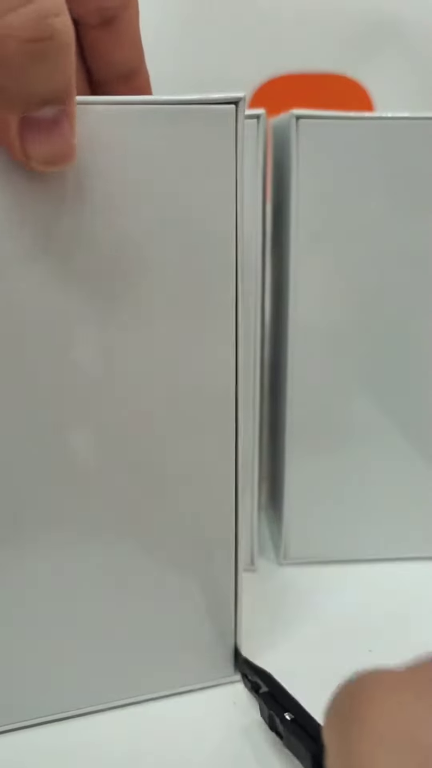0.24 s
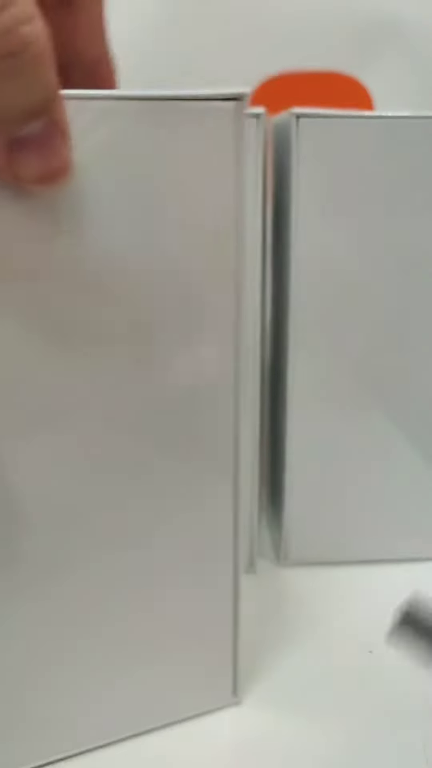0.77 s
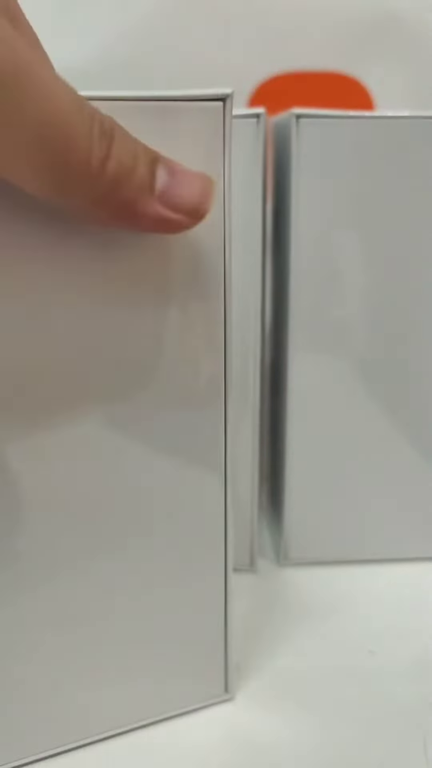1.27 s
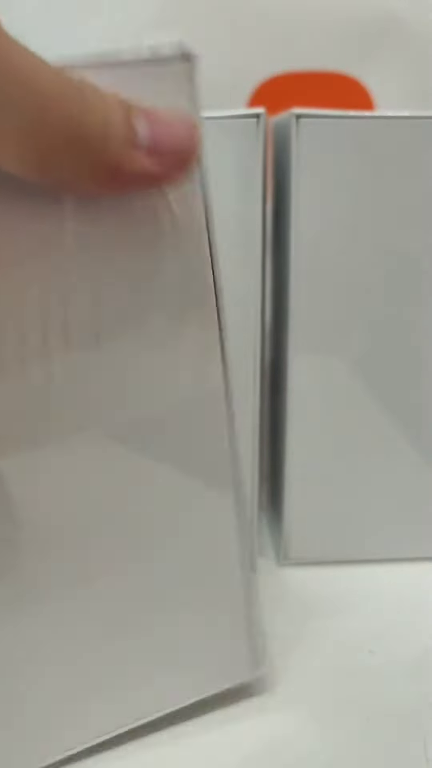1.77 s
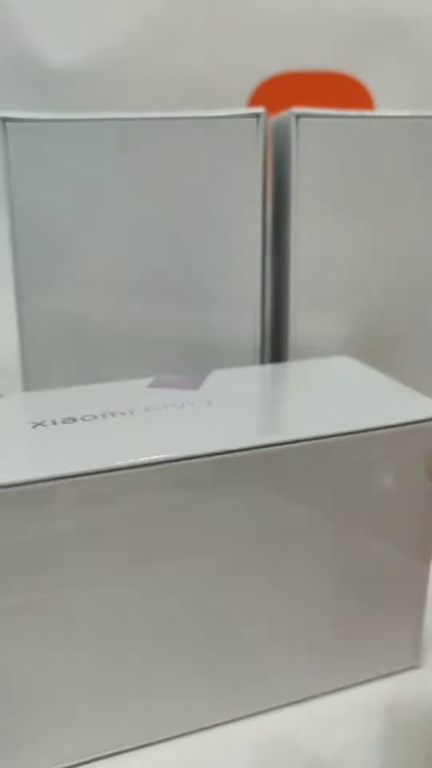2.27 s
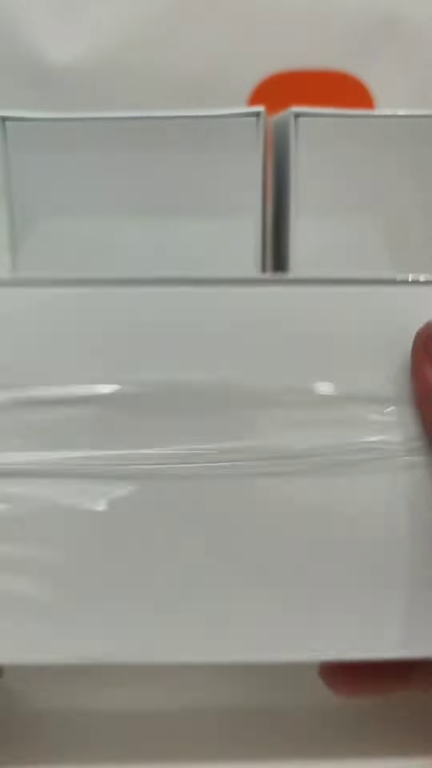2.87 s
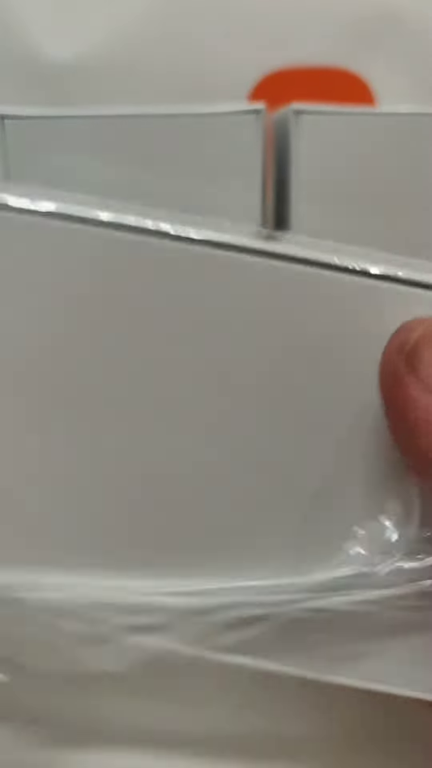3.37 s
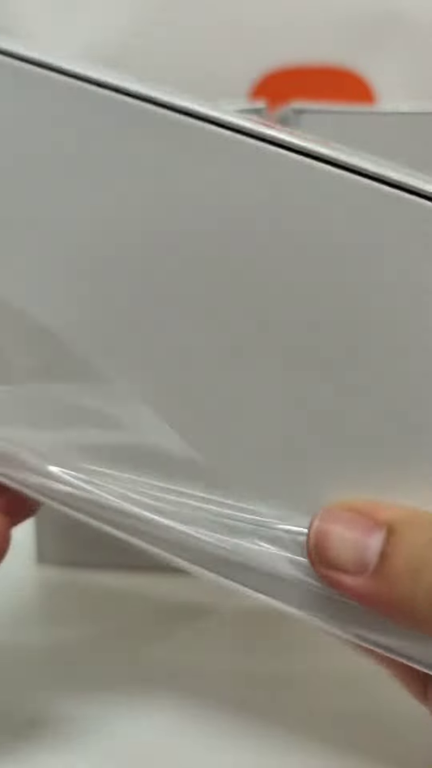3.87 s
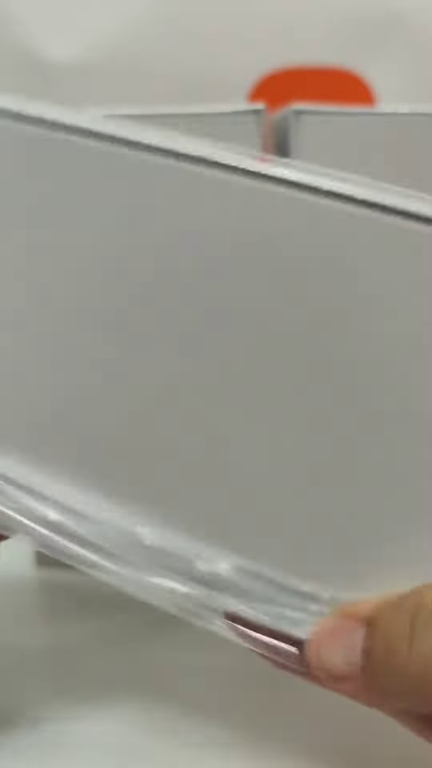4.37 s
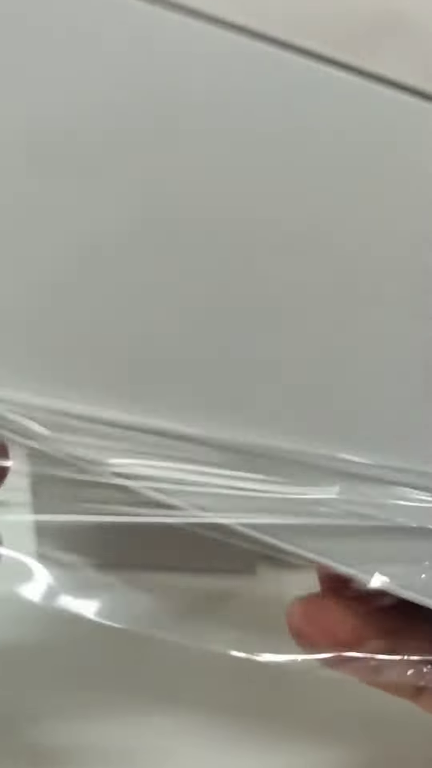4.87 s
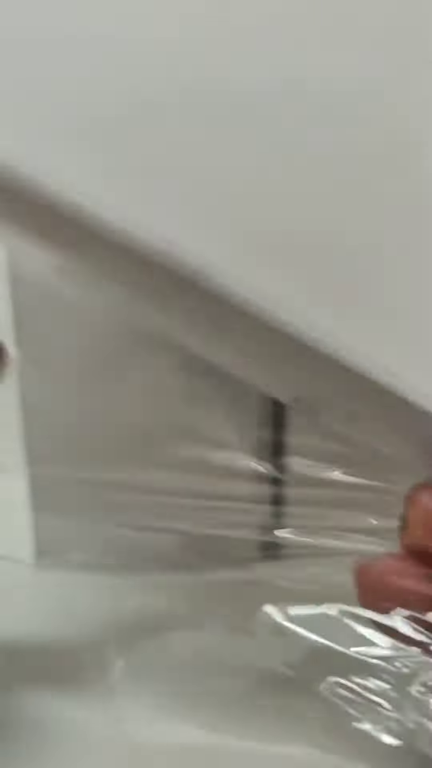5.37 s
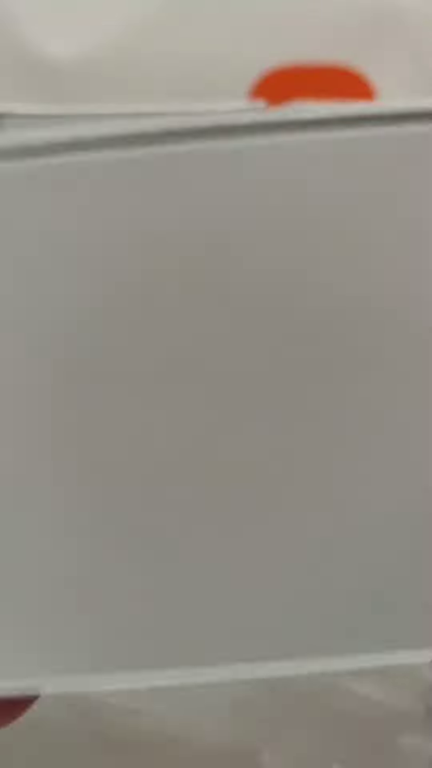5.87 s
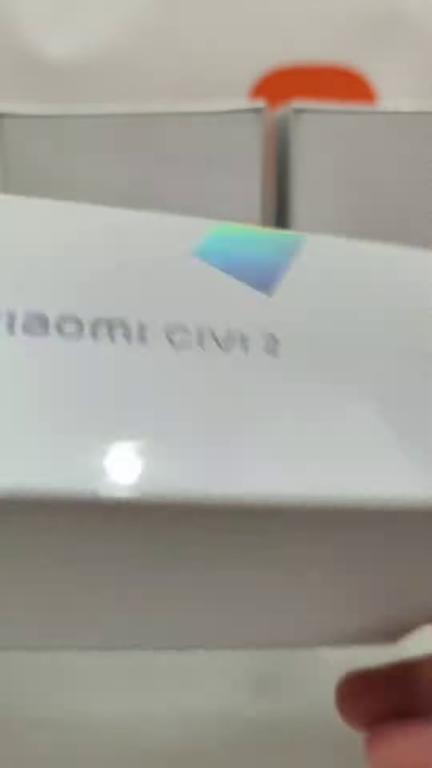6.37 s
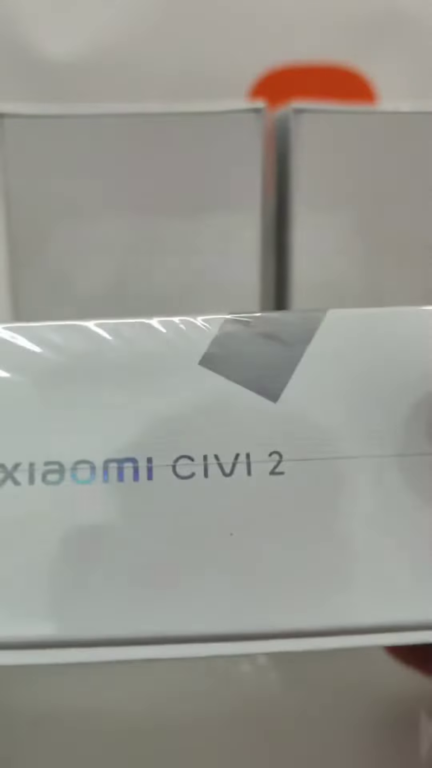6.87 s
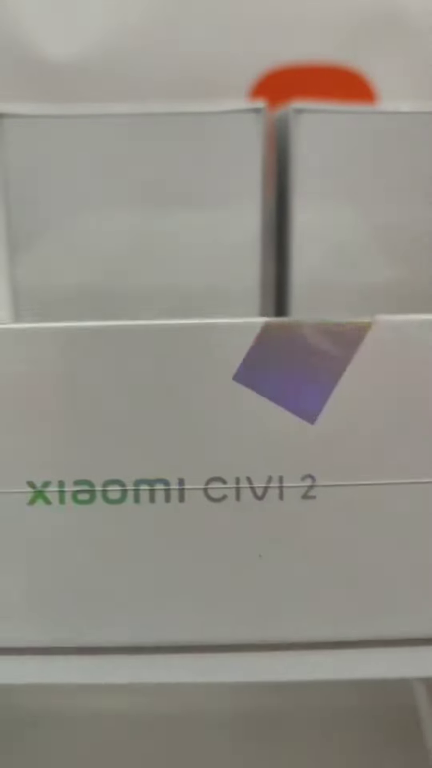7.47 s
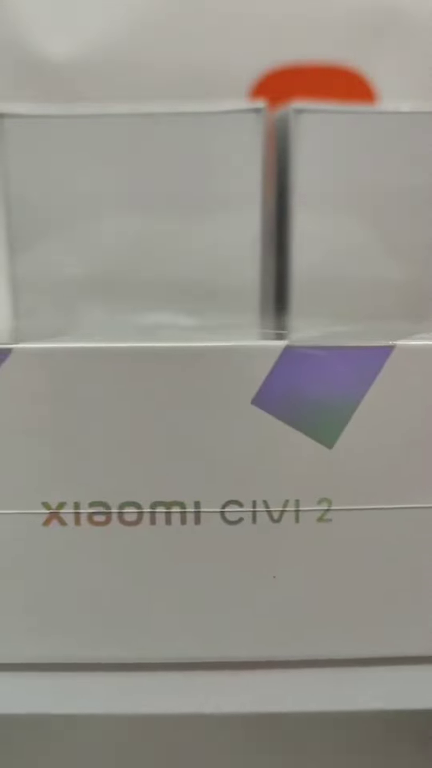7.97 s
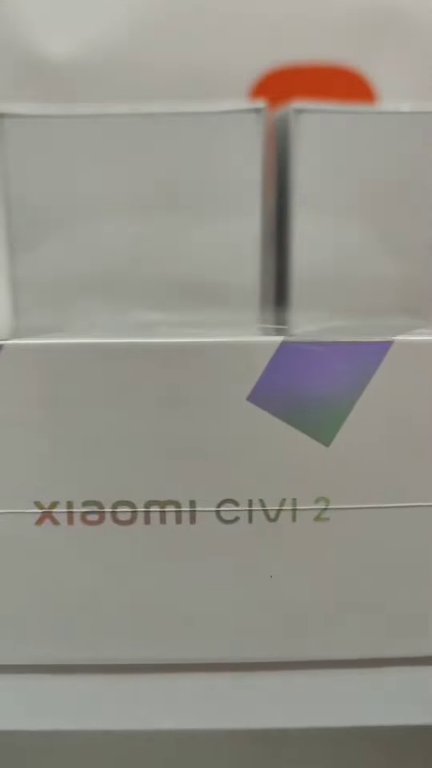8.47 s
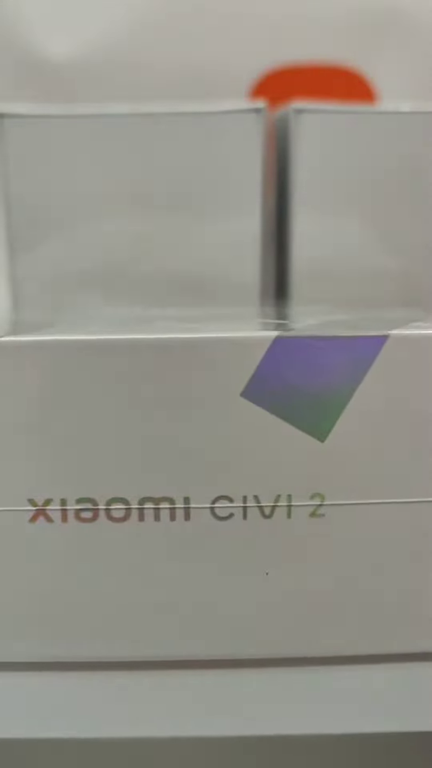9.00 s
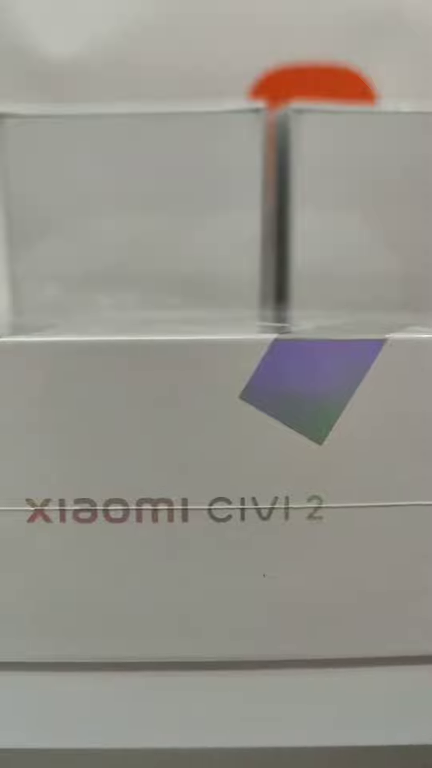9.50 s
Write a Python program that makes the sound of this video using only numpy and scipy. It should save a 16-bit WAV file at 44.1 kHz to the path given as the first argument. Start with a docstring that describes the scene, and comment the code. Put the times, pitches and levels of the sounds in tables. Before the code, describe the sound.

Close stereo microphones in a small room with a faint low hum. A wrapped paperboard box is tapped and rubbed, a blade slits its film in a brief slowing rasp, then a thin chink and loud hollow knocks. Clear film is peeled away with hisses, crackles and sharp snaps, dying to a few isolated ticks and near silence.

```python
"""A film-wrapped paperboard box is handled close to two microphones in a small room, over a low room hum.
First it is knocked and rubbed: blows excite damped wall modes, and rubs are jerky friction noise.
From about 1.1 s a blade slits the film by stick and slip, in broadly slowing slips; a thin chink
and louder knocks follow. Then, with the box held in both hands, the film is peeled off: hissing and
crackling pulls, sharp noise-burst snaps and pops, thinning out to one last faint snap."""
import sys
import numpy as np
from scipy import signal
from scipy.fft import rfft, irfft, next_fast_len
from scipy.io import wavfile
from scipy.ndimage import uniform_filter1d

SR = 44100
rng = np.random.default_rng(int(sys.argv[2]) if len(sys.argv) > 2 else 0)


def to_wav(sig):
    """Store sig (one row per channel, or 1-D mono) as 16-bit WAV at the path in sys.argv[1].

    Samples outside -1..1 are clipped; the rate is SR.
    """
    pcm = np.clip(np.atleast_2d(sig), -1, 1) * 32767
    pcm = np.round(pcm).astype(np.int16)
    wavfile.write(sys.argv[1], SR, pcm.T)  # frames by channels


N = 429534

# creases of the film that snap: start_s, peak_db, brightest_hz
CREASES = [(0.0492, -19, 2210), (2.386, -27, 3270), (2.6848, -41, 6900), (3.061, -16, 11000),
           (3.1925, -15, 9000), (3.201, -20.5, 11100), (3.244, -29, 13400), (3.302, -28, 5900),
           (3.31, -12, 6250), (3.319, -12, 9100), (3.333, -16.5, 12100), (3.341, -21, 9000),
           (3.389, -16.5, 4700), (3.439, -27, 6650), (3.466, -20.5, 5500), (3.5031, -2.5, 7330),
           (3.558, -27, 11000), (3.646, -22, 5250), (3.7226, -12.5, 6500), (3.731, -16, 6500),
           (3.7817, -20, 9000), (3.797, -16, 9100), (3.8, -19.5, 6960), (3.841, -14.5, 7440),
           (4.1306, -4.5, 6100), (4.1359, -3, 5900), (4.152, -21, 6060), (4.31, -23.5, 14900),
           (4.3938, -13, 12800), (4.473, -17.5, 5200), (4.496, -17.5, 2530), (4.689, -10, 13700),
           (4.7142, -10.5, 7500), (4.91, -14.5, 6750), (4.9188, -3, 7150), (4.924, -14.5, 6500),
           (5.002, -19, 11000), (5.016, -20, 11000), (5.0457, -5, 7150), (5.095, -18.5, 8050),
           (5.114, -14.5, 9450), (5.1556, -17, 14600), (5.182, -26.5, 7100), (5.268, -9, 10700),
           (5.283, -14, 12000), (5.2945, -11, 12100), (5.3402, 0.5, 7000), (5.3537, -9.5, 2470),
           (5.3933, -22, 5730), (5.5217, -12, 7100), (5.556, -14.5, 2430), (5.585, -18, 9500),
           (5.623, -31, 7000), (5.695, -18, 11700), (5.805, -30, 11600), (5.822, -21, 10000),
           (5.856, -16.5, 2650), (5.97, -19.5, 2830), (6.005, -27, 11000), (6.106, -18, 4030),
           (6.138, -26, 3500), (6.151, -25, 11900), (6.1842, -11, 13800), (6.19, -10.5, 2470),
           (6.248, -18, 13200), (6.26, -27.5, 11000), (6.035, -26, 6050), (6.306, -21.5, 6100),
           (6.3615, -25, 5400), (6.389, -25.5, 6040), (6.595, -30, 4850), (6.5055, -26.5, 7240),
           (6.5648, -25.5, 7440), (6.6632, -17.5, 14400), (6.715, -25.5, 6070), (6.7482, -29, 7200),
           (6.735, -22, 2620), (6.784, -19.5, 14300), (6.971, -26, 5440), (7.0494, -11.5, 14800),
           (7.2, -25.5, 3400), (7.5228, -14.5, 12450), (9.113, -31, 2980)]
# modes of the box walls: freq_hz, level_db (a blow uses half of it), t60_s (before a blow's extra damping)
WALL_MODES = [(95, -16.5, 0.44), (136.6, 1.5, 0.17), (202, 12, 0.058), (315, 1, 0.17), (368, 8, 0.11),
              (472, 5.5, 0.17), (550, -4.5, 0.22), (642, 1.5, 0.18), (761, -14, 0.19), (822, 15, 0.07),
              (990, 7, 0.038), (1210, -10.5, 0.13)]
# hands brushing, pulling and crumpling the film: start_s, hold_s, level_db
FILM_PULLS = [(0.0, 0.047, -43), (0.164, 0.047, -45), (0.594, 0.16, -52), (1.91, 0.041, -51.5),
              (2.206, 0.084, -54), (2.545, 0.16, -52.5), (2.971, 0.27, -40), (3.342, 0.062, -35.5),
              (3.45, 0.081, -37), (3.637, 0.03, -42), (3.708, 0.2, -39.5), (4.463, 0.045, -33.5),
              (4.565, 0.1, -44.5), (4.852, 0.015, -37), (4.923, 0.013, -30), (5.124, 0.0085, -30),
              (5.29, 0.071, -30), (5.351, 0.022, -19.5), (5.402, 0.028, -40), (5.523, 0.029, -29),
              (5.597, 0.049, -35.5), (5.656, 0.08, -32.5), (5.846, 0.034, -32), (5.928, 0.036, -35.5),
              (5.971, 0.075, -41), (6.15, 0.1, -40), (6.378, 0.22, -49.5), (6.71, 0.075, -43.5), ]
# the box bottom and fingers rubbing the board: start_s, hold_s, level_db, pitch_hz
BOARD_RUBS = [(0.017, 0.026, -45, 1140), (.4, 0.0072, -45, 600), (0.455, 0.019, -42, 1200),
              (.508, 0.034, -45.5, 1210), (0.577, 0.017, -46.5, 1200), (0.596, 0.053, -40.5, 920),
              (0.727, 0.023, -40, 910), (.768, 0.019, -36, 546), (1.698, 0.041, -45, 450),
              (1.904, 0.0052, -40.5, 910), (2.104, 0.16, -41.5, 1179)]

RUB_SWELL_S = .015  # base time for a rub to swell by 20 dB
SLIDE_DB_PER_S = 56  # long pulls slide more than they crumple: extra smooth hiss per second of hold


def undb(db):
    """Amplitude ratio from a level: 20 dB is a factor of ten."""
    return 10 ** (np.asarray(db) / 20)


def curve(table):
    """Linear interpolation of rows (s, ..) to one value per sample and column; -120 outside the table."""
    s, *columns = np.transpose(table)
    return [np.interp(np.arange(N) / SR, s, c, left=-120, right=-120) for c in columns]


def colour(x, points):
    """Linear filtering: weight the spectrum by (Hz, dB) points on a log axis, then bring the rms to 1."""
    size = next_fast_len(N)
    hz, db = np.transpose(points)
    bins = np.arange(1, size // 2 + 2) * SR / size
    gain = undb(np.interp(np.log(bins), np.log(hz), db))
    y = irfft(rfft(x, size) * gain, size)[..., :N]
    return y / np.sqrt(np.mean(y ** 2))


def pair(likeness, lag_s):
    """Partial coherence: noise at two microphones, the shared part reaching the left one lag_s later."""
    shared, share = rng.standard_normal(N), np.clip(likeness, 0, 1)
    both = np.array([np.roll(shared, int(lag_s * SR)), shared])
    return np.sqrt(share) * both + np.sqrt(1 - share) * rng.standard_normal((2, N))


def grains(rate, spread_db, decay_s):
    """Shot process: random tiny contacts of scattered size, rate per s, each swelling and fading; rms 1."""
    size = undb(spread_db * np.minimum(rng.exponential(size=N), 2.5))
    env = (rng.random(N) < rate / SR) * size
    for _ in range(2):
        env = signal.lfilter([1], [1, -np.exp(-1 / (decay_s * SR))], env)
    return env / np.sqrt(np.mean(env ** 2))


def add(out, sound, s, db, pan_db):
    """Superposition: place a short sound with its peak level, pan_db being left minus right."""
    i = int(s * SR)
    sound = sound[..., :N - i] / np.abs(sound).max()
    out[:, i:i + sound.shape[-1]] += sound * undb(db + np.array([[pan_db], [-pan_db]]) / 2)


def strokes(rows, swell_s=0.05):
    """Power addition of hand movements: each swells, holds and fades, the longer ones more gently."""
    t, power = np.arange(0, N, 64) / SR, 1e-18
    for s, hold_s, db, *_ in rows:
        # time before and after the hold, in units of a 20 dB change
        before = (s - t) / (swell_s + 0.19 * hold_s)
        after = (t - s - hold_s) / (0.039 + 0.81 * hold_s)
        power = power + undb(2 * (db - 20 * np.maximum(np.maximum(before, after), 0)))
    return np.interp(np.arange(N) / SR, t, np.sqrt(power))


def air():
    """Diffuse-field coherence: room hum and noise are alike at both microphones in the bass, less so above."""
    # spectral density of the room air: freq_hz, density_db
    air_colour = [(20, -3.5), (70, -6.5), (137, 0.5), (191, -5.5), (213, -10.5), (252, -4), (298, -9),
                  (427, -2), (534, -11), (932, -11.5), (1040, -10.5), (2200, -21.5), (3000, -26.5),
                  (15500, -52)]
    air_db = -47
    low, high = (signal.butter(N=2, Wn=600., btype=kind, fs=SR, output="sos") for kind in ("low", "high"))
    noise = signal.sosfilt(low, pair(0.9, 0)) + signal.sosfilt(high, pair(0.36, -.0004))
    # averaging over 50 ms leaves a sway of well under 1 dB rms
    sway_db = 35.0 * uniform_filter1d(rng.standard_normal(N), SR // 20)
    return colour(noise, air_colour) * undb(air_db + sway_db)


def room(x):
    """Reverberation: walls return an exponentially fading diffuse tail, different at each microphone."""
    room_t60_s, room_db = .25, -9
    t = np.arange(SR // 2) / SR
    tail = rng.standard_normal((2, len(t))) * np.exp(-np.log(1000) * t / room_t60_s) * (t > .004)
    tail = tail / np.sqrt((tail ** 2).sum(axis=1, keepdims=True))  # unit energy
    return undb(room_db) * signal.fftconvolve(x, tail, axes=1)[:, :N]


def chink():
    """Narrow-band resonance: a small hard part rings thinly as the box is bumped."""
    start_s, ring_hz, peak_db, t60_s = 1.683, 4200, -44.5, 0.18
    out, t = np.zeros((2, N)), np.arange(SR // 8) / SR
    ring = signal.lfilter(*signal.iirpeak(ring_hz, 20., fs=SR), rng.standard_normal(len(t)))
    add(out, ring * np.exp(-np.log(1000) * t / t60_s), start_s, peak_db, 0)
    return out


def grip():
    """Low-passed contact noise: the box shifts in the hands with dull bumps, least while the film slides."""
    grip_db = -8.5  # against the level of the pull
    bumps = pair(0.9, 0) * grains(rate=60.0, spread_db=1.5, decay_s=0.008)
    dull = colour(bumps, [(30, -12), (90, -1.0), (200, -3), (400, -24.5)])
    tugs = [(s, hold_s, db - SLIDE_DB_PER_S * hold_s) for s, hold_s, db in FILM_PULLS]
    return dull * undb(grip_db) * np.hypot(strokes(tugs), 0.56 * strokes(BOARD_RUBS))


def scrape():
    """Friction-driven resonance: jerky rubs make the walls answer in turns and sing near each rub's pitch."""
    # spectral density of rubbed board: freq_hz, density_db
    board_colour = [(100, -15), (300, -2), (480, -1.5), (600, -3), (900, -5), (1500, -9.5), (3500, -30)]
    sing_db, pull_rub_db = 14, -10  # pulled film also rubs the board, this much quieter
    env = .7 + .4 * grains(rate=60., spread_db=3.0, decay_s=.004)
    rub = pair(0.72, 0.00015) * env
    walls = 0
    for hz, _, _ in WALL_MODES:
        answer = signal.lfilter(*signal.iirpeak(hz, 14., fs=SR), rub)
        walls = walls + answer * grains(rate=25., spread_db=-7.0, decay_s=0.0085)
    sing = 0
    for row in BOARD_RUBS:
        tone = signal.lfilter(*signal.iirpeak(row[3], 14., fs=SR), rub)
        sing = sing + tone * strokes([row], RUB_SWELL_S)
    gain = np.hypot(strokes(BOARD_RUBS, RUB_SWELL_S), undb(pull_rub_db) * strokes(FILM_PULLS))
    return undb(sing_db) * sing + colour(rub + .7 * walls, board_colour) * gain


def slit():
    """Stick and slip: the tear jumps ahead once a cycle and hisses in between."""
    # blade running through the film: start_s, slips_per_s, level_db, throb_depth_db
    blade_run = [(1.11, 137, -23.5, 12), (1.17, 145, -21, 4), (1.21, 91, -22.5, 12), (1.26, 89, -25, 12),
                 (1.31, 63, -25, 10), (1.36, 98, -27.5, 4), (1.4, 18, -43, 0)]
    # spectral density of the blade's hiss: freq_hz, density_db
    blade_colour = [(710, -35), (1200, -20), (2600, -19), (3300, -10), (3770, -7.5), (6940, -1),
                    (15500, -2.5)]
    # ringing film beside the cut: freq_hz, lasts_slips (until it has faded to about a third)
    taut_film = [(2620, 13), (3550, 9.6), (5300, 46), (6000, 76)]
    rate, level_db, depth_db = curve(blade_run)
    turns = np.cumsum(np.maximum(rate, 0)) / SR
    # every slip has its own size and timing
    size, late = rng.standard_normal((int(turns[-1]) + 1, 2))[turns.astype(int)].T
    size_db = 1.4 * size
    jump = np.exp(-((turns % 1 - .5 - 0.087 * late) / 0.2) ** 2)
    # the film is slack and dull where the cut begins, tighter and brighter as it runs on
    dull_band = signal.butter(N=3, Wn=(1500., 4200.), btype="band", fs=SR, output="sos")
    body = signal.sosfilt(dull_band, pair(1.0, 0.00036)) * 1.34 * np.exp(-turns / 3.6)
    for hz, lasts in taut_film:
        ring = signal.lfilter(*signal.iirpeak(hz, 12., fs=SR), pair(0.28, 0.00017))
        body = body + 1.76 * ring * np.exp(-turns / lasts)
    throb_db = jump * (depth_db + size_db) - 0.49 * depth_db
    return (colour(pair(0.21, .0002), blade_colour) + body) * undb(level_db + throb_db)


def settling():
    """Exponential relaxation: gain of the rustle that follows every snap; small ones leave little."""
    settle_db, settle_db_per_s = -32, 139  # level against the snap, rate of fading
    kicks = np.zeros(N)
    s, db, _ = np.transpose(CREASES)
    kicks[(s * SR).astype(int)] = undb(2 * (db + settle_db))  # as power
    return np.sqrt(signal.lfilter([1], [1, -undb(-2 * settle_db_per_s / SR)], kicks))


def rustle():
    """Crackling noise: sliding film hisses; crumpling adds crackles, some broad, some in one register only."""
    # spectral density of the film: freq_hz, density_db
    film_colour = [(590, -37), (1000, -1), (1750, 12.5), (2450, 14), (3800, 8.5), (5200, 10.5), (7110, 17),
                   (9360, 7), (13500, 11.5), (15500, 4)]
    broad, out = grains(rate=120., spread_db=4.0, decay_s=.0005), 0
    slides = [(s, hold_s, db + SLIDE_DB_PER_S * hold_s) for s, hold_s, db in FILM_PULLS]
    slide = strokes(slides) / strokes(FILM_PULLS)
    edges = np.geomspace(700, 17000, 8)
    for band in zip(edges, edges[1:]):
        patch = grains(rate=32.0, spread_db=2.5, decay_s=0.0041)
        crackle = grains(rate=60.0, spread_db=4.0, decay_s=0.0008)
        grain = 0.4 * patch + 0.5 * broad + 0.35 * crackle
        env = 0.2 * slide * (band[0] / 4600.0) ** 0.84 + grain
        register = signal.butter(N=2, Wn=band, btype="band", fs=SR, output="sos")
        out = out + signal.sosfilt(register, pair(0.15, 0.00021) * env)
    return colour(out, film_colour) * np.hypot(strokes(FILM_PULLS), settling())


def knocks():
    """Modal excitation: each blow rings the walls nearest its pitch most; high blows are mostly a pop."""
    # blows on the box, pops of stretched film against it: start_s, peak_db, centre_hz, left_minus_right_db
    blows = [(0.054, -15, 510, -4), (0.06, -27, 70, 3), (0.795, -11.5, 390, -3.5),
             (1.6834, -16.5, 402, -3.5), (1.7061, -19.5, 307, 3), (2.0542, -3, 338, -2.5),
             (2.1091, -25, 294, 0), (2.3046, -3, 126, -4), (2.4995, -21, 104, 1), (2.5015, -19.5, 658, -5),
             (2.6553, -26, 156, -1), (2.8155, -30, 645, -1), (3.313, -29.5, 830, 8), (3.46, -29, 473, -1),
             (3.504, -16, 850, -7), (3.511, -18, 320, -2), (3.632, -20.5, 297, -1), (3.6876, -29, 424, -1),
             (3.709, -30.5, 510, 0), (3.746, -23.5, 440, 0), (4.1319, -24, 427, 8.5), (4.397, -25, 154, 6),
             (4.69, -25, 788, 11), (4.924, -12.5, 807, 4.5), (5.047, -10.5, 1104, 6), (5.22, -27, 298, 5),
             (5.2856, -18, 248, 6), (5.304, -26, 250, -2), (5.332, -15, 760, 2), (5.3543, -19, 850, -11),
             (5.523, -23, 790, -4), (5.709, -27, 780, -4), (5.756, -25.5, 885, 1), (5.87, -21.5, 1380, -11),
             (5.994, -27, 358, 1), (6.1843, -28.5, 109, -3), (6.2492, -26.5, 930, -9), (6.74, -33, 690, -5),
             (6.7833, -28, 78.5, -2), (7.525, -31.5, 750, -7)]
    lifted_s = 2.9  # the box leaves the table and is held in both hands
    contact_cycles = 0.094  # cycles of its pitch that a blow takes to land
    out, t = np.zeros((2, N)), np.arange(SR // 4) / SR
    hz, db, t60 = np.transpose(WALL_MODES)[:, :, None]
    chance = rng.standard_normal((len(blows), 2, len(WALL_MODES), 1))
    for (s, peak_db, centre_hz, pan_db), (detune, scatter) in zip(blows, chance):
        held = s > lifted_s
        weight = undb(.5 * db - 4.2 * np.abs(np.log2(hz / centre_hz)) + 2.0 * scatter)
        # high blows ring shorter, and so does a box gripped in both hands
        damping = 2.0 + 0.96 * held + centre_hz / 1400.0
        decay = np.exp(-np.log(1000) * t * damping / t60)
        modes = np.sin(2 * np.pi * hz * (1 + 0.042 * detune) * t)
        ring = -(weight * decay * modes).sum(axis=0)
        ring = undb(-4. * held) * ring / np.abs(ring).max()
        partials = np.sin(2 * np.pi * centre_hz * t) + 0.43 * np.sin(2 * np.pi * 1.766 * centre_hz * t)
        pop = -partials * 2.34 * t * centre_hz * np.exp(-t * centre_hz / 0.91)
        crack = signal.lfilter([.2], [1, -.9], rng.standard_normal(len(t))) * np.exp(-t / 0.012)
        landing = 1 - np.exp(-t * centre_hz / contact_cycles)
        blow = landing * (ring + (centre_hz / 696.0) ** 2 * pop) + 0.036 * crack
        add(out, blow, s, peak_db, pan_db)
    # the knocks are thinned below about 75 Hz
    return signal.lfilter(*signal.butter(N=2, Wn=75., btype="high", fs=SR), out)


def snaps():
    """Buckling: a crease flips in a burst of a few ms, broad but brightest at one pitch, its side varying."""
    base_s, cycles = 0.0011, 2.9  # time scale: a short base, plus a few cycles of the pitch
    out, t = np.zeros((2, N)), np.arange(SR // 30) / SR
    for s, peak_db, hz in CREASES:
        scale_s = base_s + cycles / hz
        burst = np.exp(-np.abs(t / scale_s - 3) * 1.3)
        env = burst + 0.07 * np.exp(-t / 0.011) * (t > 3 * scale_s)
        shared = rng.standard_normal(len(t))
        both = np.array([np.roll(shared, int(.0002 * SR)), shared])
        noise = both + 1.3 * rng.standard_normal((2, len(t)))
        peak = signal.lfilter(*signal.iirpeak(min(hz, 16000.), 6., fs=SR), noise)
        cut_hz = min(240.0 + 0.14 * hz, 9000)
        broad = signal.lfilter(*signal.butter(N=2, Wn=cut_hz, btype="high", fs=SR), noise)
        pan_db = -.6 + 1.0 * rng.standard_normal()
        add(out, (0.69 * peak + 0.32 * broad) * env, s - scale_s, peak_db, pan_db)
    return out


def scene():
    """Superposition of all sources; only the short sounds and the slit excite the room's tail."""
    near = knocks() + snaps() + slit() + chink()
    return near + room(near) + rustle() + scrape() + grip() + air()


def record(dry):
    """Band limiting: the microphones have a dip in the treble, fade near the top and cut the rest."""
    dip_hz, fade_hz, top_hz = 7800, 15500, 16800
    dipped = dry - .5 * signal.lfilter(*signal.iirpeak(dip_hz, 9.0, fs=SR), dry)
    faded = signal.sosfilt(signal.cheby1(N=12, rp=1, Wn=fade_hz, fs=SR, output="sos"), dipped)
    return signal.sosfilt(signal.ellip(8, .2, 70, top_hz, fs=SR, output="sos"), faded)


dry = scene()
out = record(dry)
to_wav(out)
```